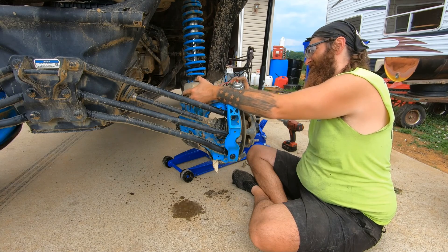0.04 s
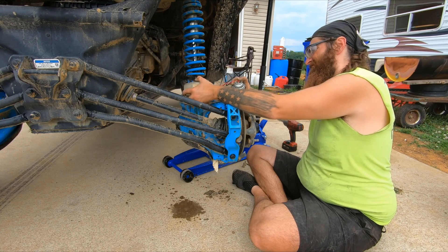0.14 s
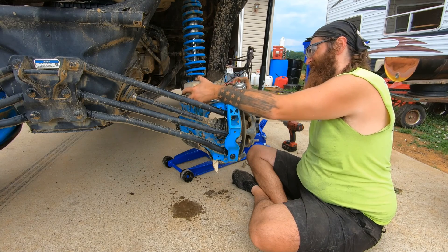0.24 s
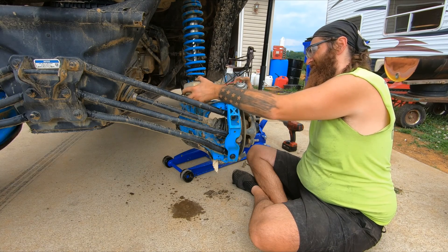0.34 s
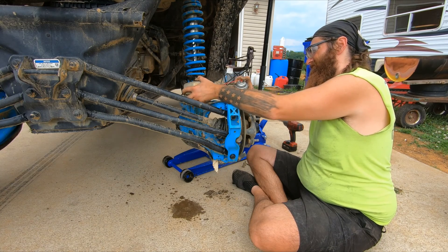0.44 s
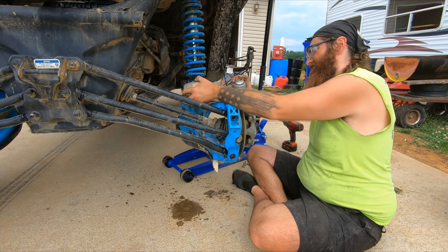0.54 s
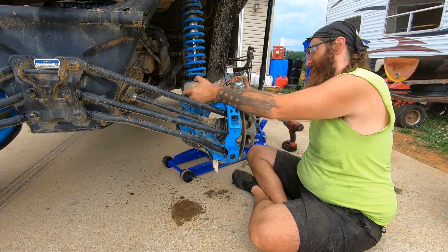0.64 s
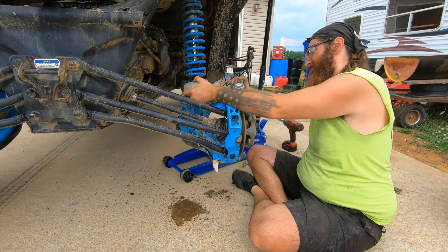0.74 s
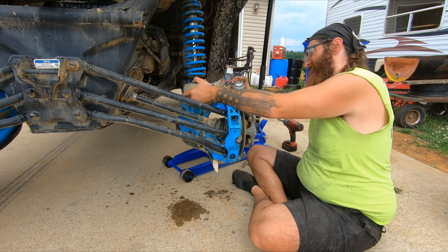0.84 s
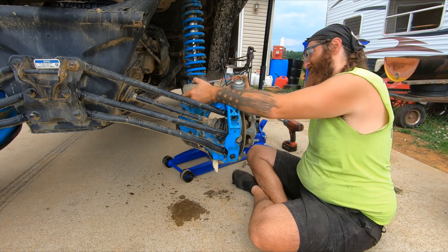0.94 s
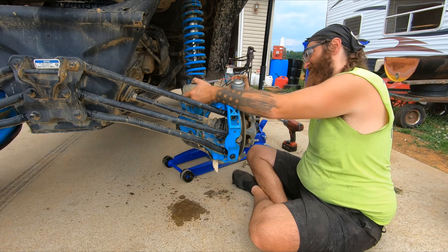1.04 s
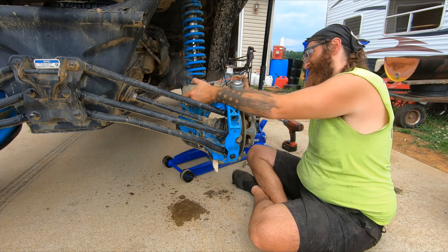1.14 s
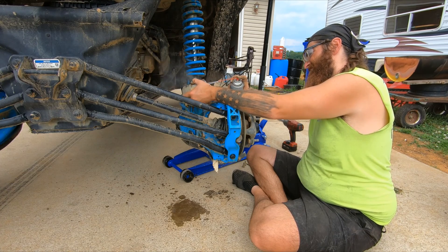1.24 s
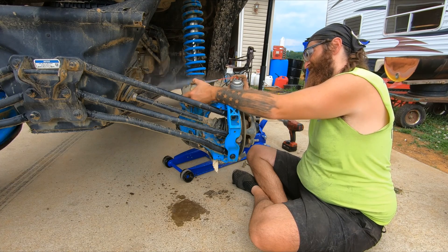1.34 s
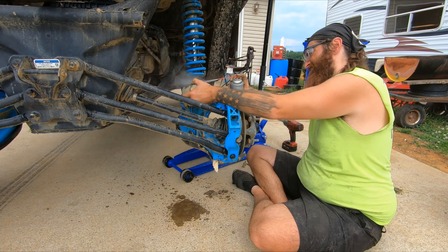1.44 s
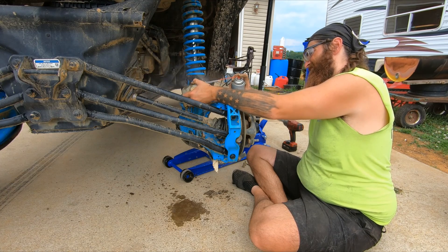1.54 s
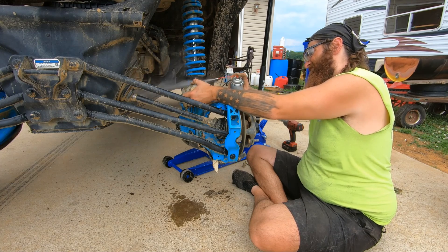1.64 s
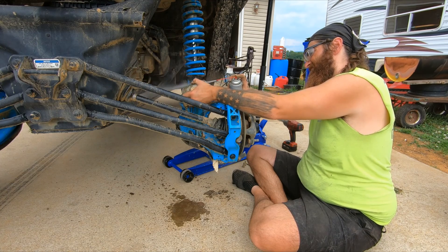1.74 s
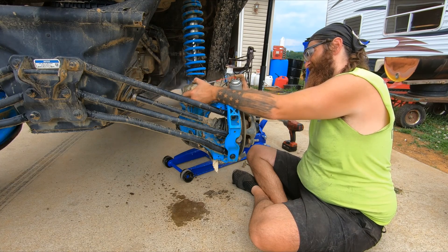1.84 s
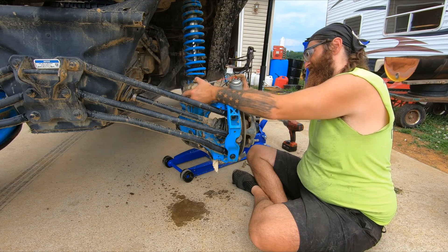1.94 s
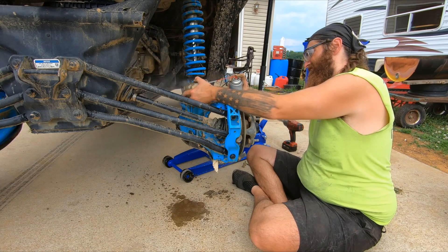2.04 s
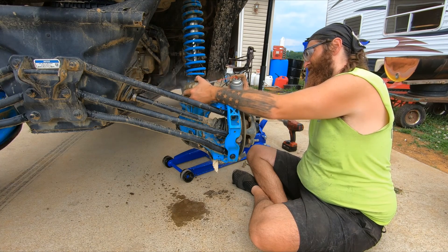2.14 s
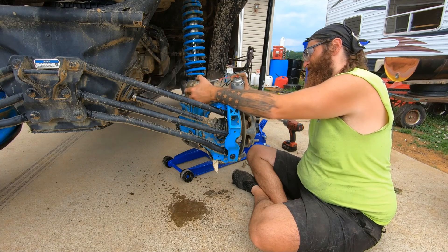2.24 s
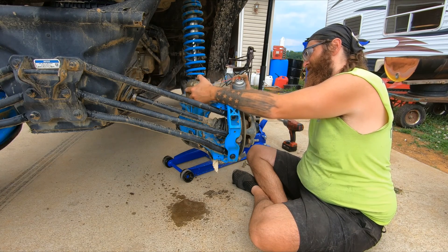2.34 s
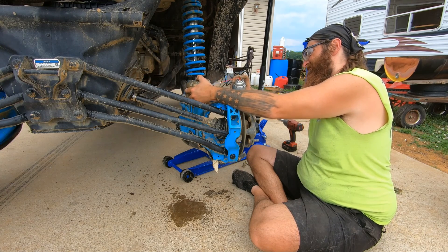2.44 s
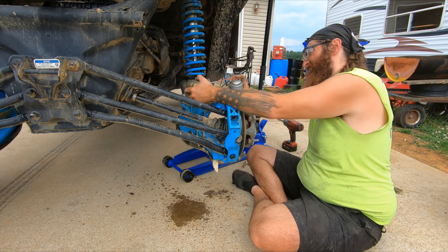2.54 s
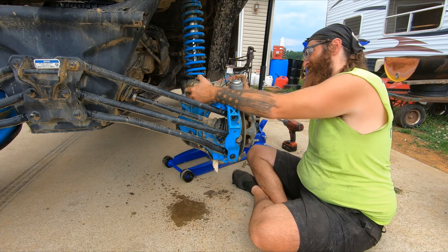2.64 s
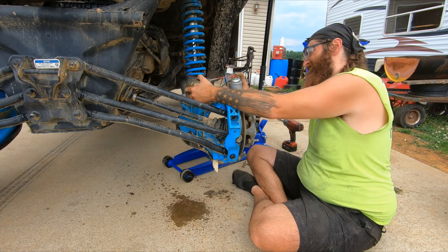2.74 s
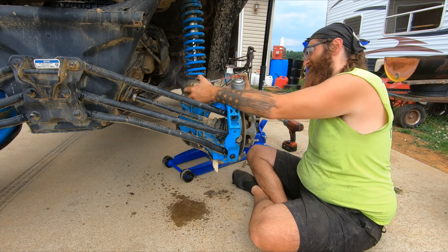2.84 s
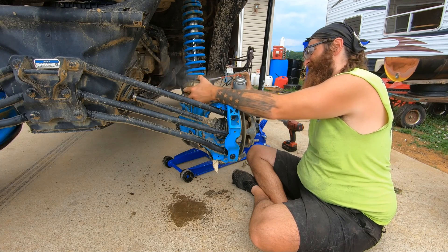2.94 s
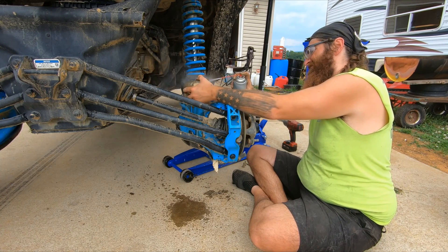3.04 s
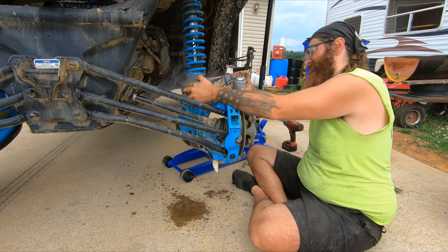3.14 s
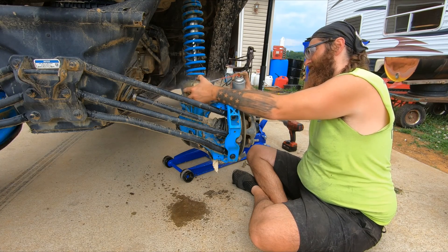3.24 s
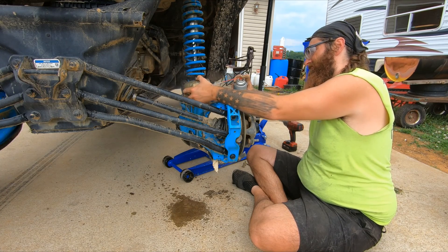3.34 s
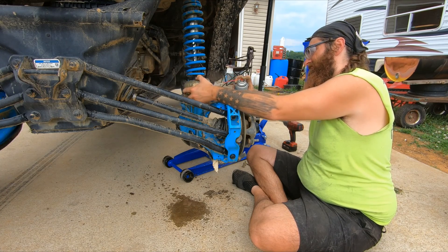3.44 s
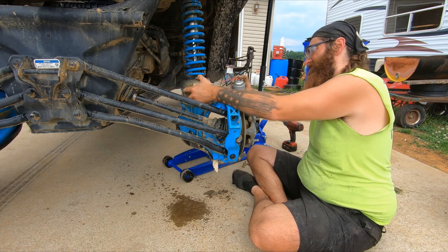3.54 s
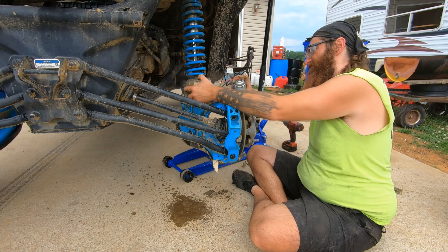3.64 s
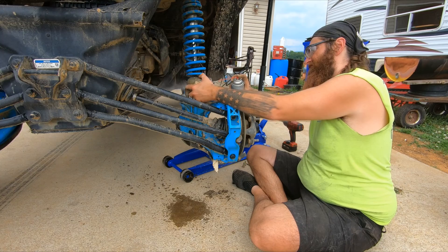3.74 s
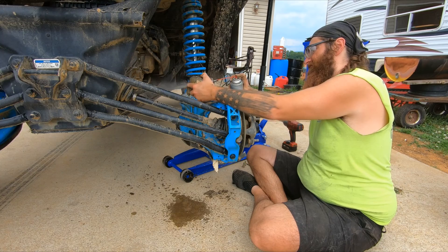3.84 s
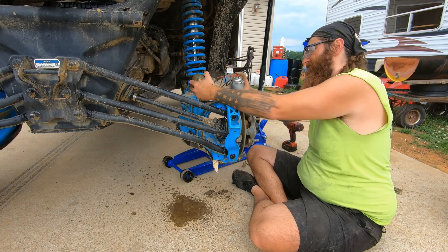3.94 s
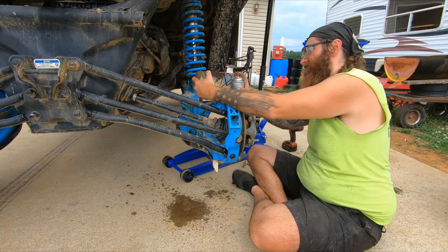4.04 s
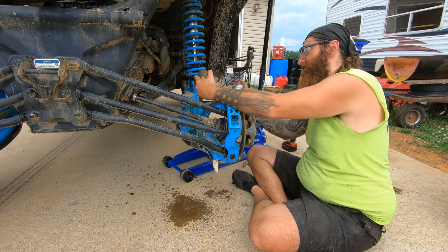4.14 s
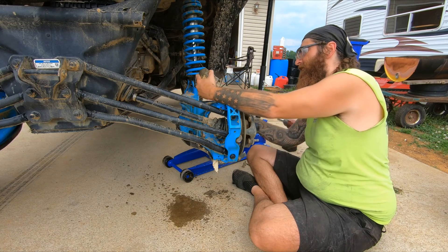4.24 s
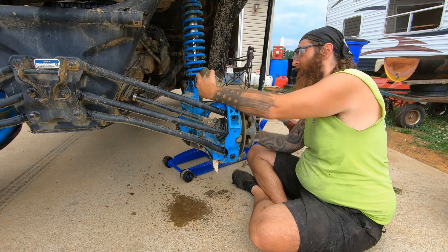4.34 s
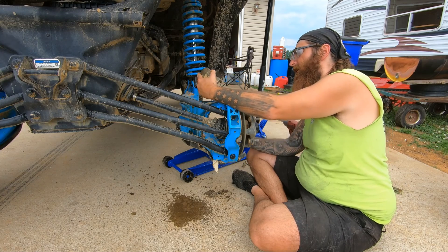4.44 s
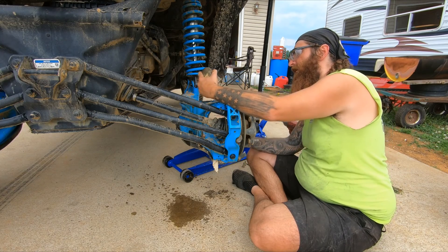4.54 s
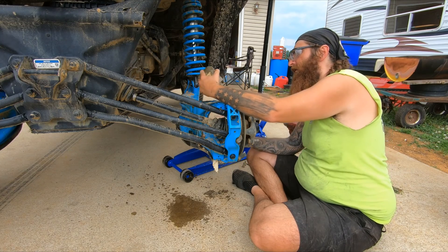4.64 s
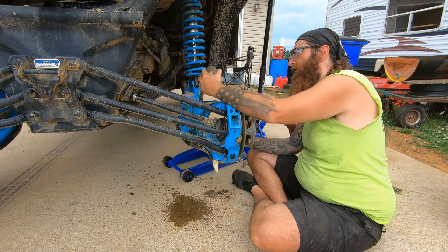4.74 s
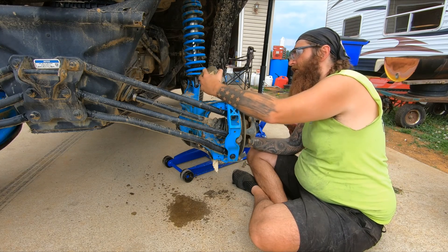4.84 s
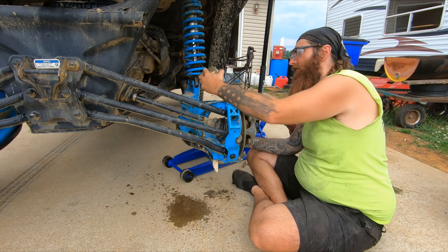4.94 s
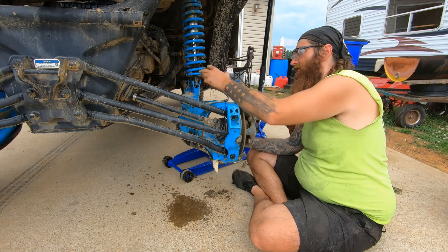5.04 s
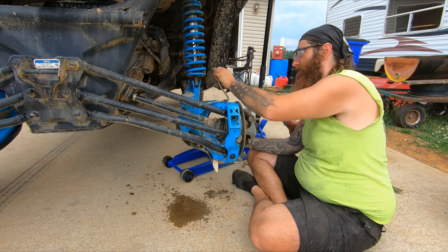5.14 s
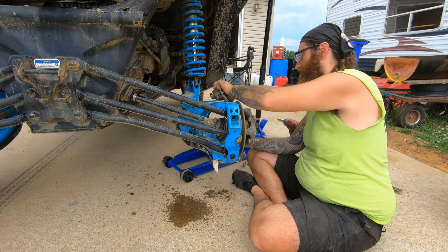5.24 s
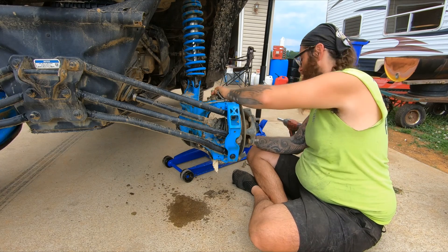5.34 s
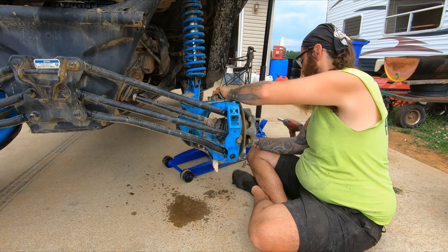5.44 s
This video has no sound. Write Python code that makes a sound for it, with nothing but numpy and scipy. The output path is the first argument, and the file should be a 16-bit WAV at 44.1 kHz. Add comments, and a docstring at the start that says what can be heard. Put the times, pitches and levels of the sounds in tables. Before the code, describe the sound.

Close, bright hiss of a pressurized spray can playing over hollow steel parts, with quick metallic ringing and dull splats as the jet crosses edges. Just before four seconds a brief wavering whistle appears, then the valve snaps shut. A faint leak fades, leaving a low engine drone, soft outdoor wash, a far bird's gliding notes and light rustles. Stereo microphone nearby in an open yard.

```python
"""A spray can hisses close by, and its jet makes hollow steel parts ring: noise excites their resonances.
A slow engine, built from multiples of its turning rate, drones all along over outdoor noise and low thumps.
Near the end of the spray a tube mouth whistles; then the valve shuts and a faint leak dies away.
After that a far bird calls in gliding tones, and noise swells rustle and tick in the yard."""
import sys
import numpy as np
from scipy import signal
from scipy.io import wavfile
from scipy.ndimage import uniform_filter1d, map_coordinates

SR = 44100
rng = np.random.default_rng(int(sys.argv[2]) if len(sys.argv) > 2 else 0)


def generate_wav(signal):
    """Clip the signal to [-1, 1] and save it as 16-bit WAV at the path in sys.argv[1]."""
    frames = np.transpose(np.atleast_2d(signal))
    scaled = np.clip(frames, -1, 1) * 32767
    pcm = np.round(scaled).astype(np.int16)
    wavfile.write(sys.argv[1], SR, pcm)


N = 242363

FLOW_DB = -36  # hiss level with the valve open
SHUT_S, SHUTTING_S = 4.064, 0.043  # moment the valve starts to shut, time it takes
SQUARENESS = 2.8  # swells on the steel and the engine have steep edges (2 = bell)


def gain_of(db):
    """Turns dB into a gain."""
    return 10 ** (np.asarray(db) / 20)


def evened(x):
    """Scales a signal to rms 1."""
    return x / np.sqrt(np.mean(x ** 2) + 1e-20)


def read(points, hz):
    """Reads a table over frequency, on a log axis, as a column."""
    f, value = np.transpose(points)
    return np.interp(np.log(hz + 1), np.log(f + 1), value)[:, None]


def curve(rows, order):
    """Reads one column of a table over time, sample by sample."""
    rows = np.array(rows)
    return np.interp(np.arange(N) / SR, rows[:, 0], rows[:, order])


def drift(top_hz):
    """Smooth random wavering of rms 1, with up to top_hz changes a second."""
    knots = rng.standard_normal(400)
    coarse = np.arange(0, N + 128, 128)
    smooth = map_coordinates(knots, [coarse / SR * 2 * top_hz], order=3)
    return evened(np.interp(np.arange(N), coarse, smooth))


def bumps(rows, squareness=2):
    """Power of smooth swells (middle t/s, length/s, level/dB), one row each, every 64 samples."""
    t = np.arange(0, N + 64, 64) / SR
    rows = np.array(rows)
    shape = np.exp(-abs(2 * (t - rows[:, :1]) / rows[:, 1:2]) ** squareness)
    return t, gain_of(2 * rows[:, 2:]) * shape


def hiss(colour, patchy_db, same=0., lead=0., tilt_db=0., ridges_db=0.):
    """Stereo noise from random short-time spectra, with drifting patches and narrow, shifting ridges."""
    # where the shifting ridges show: f/Hz, share of their depth
    ridge_share = [(400, .5), (2500, .5), (4000, 1), (10500, 1), (11500, .5)]
    hz = np.fft.rfftfreq(1024, 1 / SR)
    a, b, c, d, patches, ridges = rng.standard_normal((N // 256 + 5, 513, 6)).T
    patches = uniform_filter1d(patches, size=12, axis=0)
    patches = evened(uniform_filter1d(patches, size=10, axis=1))
    # narrow in frequency, long in time
    ridges = uniform_filter1d(ridges, size=2, axis=0)
    ridges = evened(uniform_filter1d(ridges, size=70, axis=1))
    left = a + 1j * b
    same = np.clip(same, -1, 1)
    right = same * left * np.exp(-1j * lead) + np.sqrt(1 - same ** 2) * (c + 1j * d)
    spectra = np.array([left * gain_of(tilt_db / 2), right * gain_of(-tilt_db / 2)])
    ridge_level_db = ridges_db * read(ridge_share, hz) * ridges
    spectra *= gain_of(read(colour, hz) + patchy_db * patches + ridge_level_db)
    return evened(signal.istft(spectra, nperseg=1024, noverlap=768)[1][:, :N])


def mode(force, hz, width, apart, order=1):
    """One resonance driven by noise: a pole pair, used once or, for steeper sides, twice; channels differ."""
    r = np.exp(-np.pi * width * order / SR)
    sections = [[1, 0, -0.997, 1, -2 * r * np.cos(2 * np.pi * hz / SR), r * r]] * order
    common, own = rng.standard_normal((2, N))
    drops = force * np.array([common + apart * own, 0.89 * (common - apart * own)])
    impulse_response = signal.sosfilt(sections, signal.unit_impulse(SR // 4))
    return signal.sosfilt(sections, drops) / np.linalg.norm(impulse_response)


def open_valve():
    """Flow through the nozzle as a gain: it builds up, is quickly shut, then a leak dies away."""
    leak_db, leak_db_per_s = -63, -135  # level once shut, and how fast it then falls
    build_db, build_s = -1, 0.78  # the flow starts a little weaker and builds up
    t = np.arange(N) / SR
    late = t - SHUT_S
    shut = np.clip(late / SHUTTING_S, 0, 1)
    start_db = build_db * np.clip(1 - t / build_s, 0, 1) ** .5
    dying_db = leak_db_per_s * np.maximum(late - SHUTTING_S, 0)
    return gain_of(FLOW_DB + start_db + (leak_db - FLOW_DB) * shut + dying_db)


def nozzle():
    """Turbulent flow makes a hiss that flickers quickly and dips now and then."""
    # colour of the hiss: f/Hz, relative level/dB per Hz
    colour = [(150, -47.5), (250, -21), (625, -8), (1270, -4.5), (1900, -3.5), (4100, -3), (7800, -8.5),
              (8350, -3), (8700, -12), (9500, -2), (10050, 0), (11600, -17), (13000, -13.5), (14200, -14.5),
              (15100, -23), (15300, -28), (15700, -32.5)]
    # brief dips of the hiss: t/s, level/dB
    dips = [(1.97, -3), (2.76, -6), (3.41, -6.5), (3.77, -4.5), (3.869, -8.5)]
    # left against right: f/Hz, likeness (0 to 1)
    likeness = [(60, 0.89), (99, 0.98), (160, 0.93), (270, 0.6), (450, .95), (700, 0.8), (900, .5),
                (1220, 0.65), (1500, .85), (2010, 0.7), (3000, 0.97), (4300, 0.94), (5200, 0.76),
                (7200, 0.78), (8400, .1), (9400, .62), (10500, .45), (13400, .4), (15000, 0.6)]
    # left against right: f/Hz, phase by which left leads/rad
    phase_lead = [(0, 0), (800, .4), (1000, 0), (1300, -.8), (1700, .3), (2050, -.4), (3100, 0), (5680, .2),
                  (6800, 0.5), (7320, .9), (7920, 1.3), (8900, -1.7), (9700, -.5), (10500, -1),
                  (11000, 1.2), (12000, 0.0), (15200, 0.0)]
    # left against right: f/Hz, level/dB
    balance = [(60, -1.0), (110, -1.0), (200, -0.5), (380, -1.3), (700, 1.5), (1290, 1.5), (2380, 1.0),
               (4400, 1.5), (8120, 0.3), (15000, 0.7)]
    sputter_db, patchy_db, ridges_db = 0.26, 2, 3  # flicker of the flow, drifting patches, shifting ridges
    hz = np.fft.rfftfreq(1024, 1 / SR)
    t = np.arange(N) / SR
    noise = hiss(colour, patchy_db, read(likeness, hz), read(phase_lead, hz), read(balance, hz), ridges_db)
    dips_db = sum(db * np.exp(-((t - s) / 0.009) ** 2) for s, db in dips)
    return gain_of(sputter_db * drift(25.0) + dips_db) * open_valve() * noise


def ring(modes, steady_db, swells, apart, favoured_hz=None, order=2):
    """The jet drives resonances steadily; each swell lifts them, most those near its favoured pitch."""
    flutter_db, wander_db = 1.36, 1.5  # shake of the hand; each mode waxes and wanes as the jet moves
    spill, favour = .22, 2.6  # share of a swell's power in all modes, and extra in the favoured ones
    focus = 0.06  # relative pitch range that a swell favours
    t, power = bumps(swells, SQUARENESS)
    steady = gain_of(2 * (steady_db + flutter_db * drift(14.)))
    flow = open_valve() / gain_of(FLOW_DB)
    out = np.zeros((2, N))
    for hz, width, db in modes:
        near = np.ones(len(power))
        if favoured_hz is not None:
            near = spill + favour / (1 + (np.log(hz / favoured_hz) / focus) ** 4)
        force = np.sqrt(steady + np.interp(np.arange(N) / SR, t, near @ power))
        level = gain_of(db + wander_db * drift(4.004))
        out += mode(level * force * flow, hz, width, apart, order=order)
    return out / np.linalg.norm(gain_of([m[2] for m in modes]))


def steel():
    """The jet makes thick and thin parts ring and splats dully; lasting ridges colour the hiss."""
    # resonances of the thick parts: f/Hz, width/Hz, relative level/dB
    thick_modes = [(1062, 35, -3), (1475.5, 53, 5), (1584, 80, -2), (1606, 27, 2.5), (1755, 48, 7.5),
                   (1900, 20, 4.5), (1980, 190, 7)]
    # resonances of the thin parts: f/Hz, width/Hz, relative level/dB
    thin_modes = [(2110, 50, -4.5), (2265, 44, 2.5), (2460, 72, 3), (2570, 78, 2), (2857, 33, 1),
                  (2962, 40, -4.5), (3106, 81, 6.5), (3238, 37, -2.5), (3614, 84, 1), (4430, 51, -5)]
    # resonances of the dull splash: f/Hz, width/Hz, relative level/dB
    splash_modes = [(410, 193, -3), (607, 42, -5.5), (903, 440, -1)]
    # lasting ridges in the upper hiss: f/Hz, width/Hz, level against the flow/dB
    lasting_ridges = [(5220, 54, -27), (5720, 86, -17), (6286, 85, -15), (6630, 38, -17), (6890, 120, -15),
                      (7280, 51, -17), (7660, 88, -13.5)]
    # slow aim of the jet: t/s, thick parts level/dB, thin parts level/dB
    aim = [(0.0, -41.5, -40), (0.2, -46.5, -44), (0.33, -42, -43.5), (0.55, -46.5, -46.5),
           (0.72, -42, -41.5), (.8, -39, -41), (.86, -42.5, -37), (0.97, -37.5, -39), (1.15, -41, -43.5),
           (1.39, -47, -47), (1.83, -46.5, -44.5), (2.34, -42.5, -47), (2.58, -49, -36.5),
           (2.87, -43.5, -41), (3.15, -49, -47.5), (3.73, -54, -44), (3.92, -44, -43.5), (4.03, -54, -64)]
    # the jet crosses an edge: middle t/s, length/s, thick parts level/dB, thin parts level/dB, favoured f/Hz
    crossings = [(0.04, 0.038, -27, -29, 2740), (0.562, 0.036, -31, -42, 3100),
                 (0.622, 0.1, -38, -46.5, 1740), (0.684, 0.025, -45, -34, 2950),
                 (0.686, 0.022, -34, -37, 1875), (0.78, 0.018, -37.5, -37, 1900),
                 (0.81, 0.032, -47, -37, 2490), (0.888, 0.029, -31, -35.5, 2470),
                 (0.927, 0.016, -32, -38.5, 1810), (0.931, 0.027, -41.5, -30, 2880),
                 (.932, 0.018, -44.5, -35, 2500), (1.02, 0.03, -34.5, -33.5, 2490),
                 (1.053, 0.024, -34, -55, 1490), (1.053, 0.042, -42.5, -35, 3180),
                 (1.103, 0.025, -44, -32, 1920), (1.166, 0.045, -46, -45.5, 3200),
                 (1.178, 0.044, -58, -31.5, 4430), (1.266, 0.051, -34, -54, 1860),
                 (1.33, 0.039, -38.5, -34, 1900), (1.401, 0.069, -37.5, -33.5, 1780),
                 (1.446, 0.0079, -29.5, -63, 1910), (1.548, 0.042, -34.5, -30.5, 1810),
                 (1.699, 0.017, -32.5, -43, 2050), (1.856, 0.028, -40.5, -56, 1980),
                 (1.967, 0.012, -32.5, -30.5, 1700), (2.063, 0.0085, -37, -30.5, 1820),
                 (2.214, 0.039, -40.5, -54, 1750), (2.328, 0.023, -51, -34, 2370),
                 (2.333, 0.021, -55, -39.5, 3130), (2.354, 0.018, -32, -33, 2500),
                 (2.469, 0.025, -27.5, -25, 2460), (2.473, 0.029, -58, -37, 3030),
                 (2.57, .07, -56.5, -31, 4430), (2.543, 0.034, -33, -36.5, 3150),
                 (2.58, 0.054, -34, -35, 3200), (2.636, 0.021, -32.5, -32, 3180),
                 (2.611, 0.028, -36, -50, 1600), (2.716, 0.024, -53, -39.5, 3140),
                 (2.725, 0.029, -31, -25.5, 2780), (2.822, 0.022, -33, -32, 3140),
                 (2.834, 0.078, -50, -37, 2300), (2.89, 0.014, -50, -44, 3050), (3, 0.014, -38, -41, 2490),
                 (3.392, 0.016, -38, -34.5, 2950), (3.441, 0.047, -37.5, -40.5, 2100),
                 (3.503, 0.03, -30, -30.5, 2570), (3.507, 0.032, -55, -37, 3130),
                 (3.594, 0.043, -41, -56, 1750), (3.764, 0.022, -41.5, -35, 1900),
                 (3.854, 0.05, -39, -39.5, 2750)]
    # the jet splats on a flat face: middle t/s, level/dB
    splats = [(.565, -48.5), (0.684, -42), (.84, -49), (1.65, -50), (1.826, -48.5), (1.863, -47),
              (1.967, -42.5), (2.066, -41), (2.358, -40), (2.746, -47), (3.392, -41), (3.64, -45.5),
              (3.77, -40.5), (3.843, -39)]
    splat_s, splash_db = 0.017, -55  # length of every splat, steady splash level
    s, length, thick_db, thin_db, hz = np.transpose(crossings)
    thick = ring(thick_modes, curve(aim, order=1), np.c_[s, length, thick_db], 0.37, hz)
    thin = ring(thin_modes, curve(aim, order=2), np.c_[s, length, thin_db], 0.2, hz)
    splat_swells = [(at, splat_s, db) for at, db in splats]
    splash = ring(splash_modes, splash_db, splat_swells, 0.148, order=1)
    flow = open_valve() * (np.arange(N) / SR < SHUT_S + SHUTTING_S)
    ridges = sum(mode(flow * gain_of(db + 3.25 * drift(1.416)), hz, width, 0.66)
                 for hz, width, db in lasting_ridges)
    return thick + thin + splash + ridges


def whistle():
    """The jet blows across a tube mouth: a wavering, throbbing tone with airy noise that outlasts the spray."""
    # the tone and its noise: t/s, f/Hz, level/dB
    blown_tone = [(3.88, 1590, -70), (3.908, 1590, -43), (3.93, 1600, -50), (3.95, 1590, -41),
                  (3.972, 1590, -36), (4.0, 1610, -43), (4.022, 1645, -37), (4.045, 1625, -48),
                  (4.066, 1640, -43), (4.085, 1660, -64), (4.125, 1650, -73), (4.16, 1660, -76),
                  (4.26, 1650, -88)]
    faded_in_and_out = [(0, 0, -140)] + blown_tone + [(4.5, 0, -140)]
    force = gain_of(curve(faded_in_and_out, order=2))
    pitch = curve(blown_tone, order=1) * (1 + 0.0047 * drift(23.0))
    tone = np.sqrt(2) * np.sin(2 * np.pi * np.cumsum(pitch) / SR)
    airy = 0.99 * mode(force, 1640, 42.0, .2)
    return force * tone * gain_of([[.7], [-.7]]) + airy


def yard(x, level_db, t60):
    """Walls around return a short diffuse echo: dying noise, different in each channel."""
    t = np.arange(SR // 2) / SR
    # t60 is the time to fall by 60 dB; the echo starts after 8 ms
    tail = rng.standard_normal((2, len(t))) * gain_of(-60 * t / t60) * (t > .008)
    return gain_of(level_db) * signal.fftconvolve(x, tail / np.linalg.norm(tail[0]), axes=1)[:, :N]


def engine():
    """Multiples of the turning rate waver one by one; the lowest share a boom, the ninth swells alone."""
    # strength of each multiple (the ninth takes its level from its swells): multiple, relative level/dB
    orders = [(1, -37), (2, -32), (3, -11), (4, -5), (5, -4.5), (6, -13.5), (7, -6), (8, -10.5), (9, 0),
              (10, -10.5), (11, -9.5), (12, -15.5), (13, -16.5), (14, -13.5), (15, -31), (16, -26.5)]
    # shared level of the first six multiples: t/s, level/dB
    boom = [(0.0, -58), (0.03, -45.5), (0.14, -54), (0.17, -76), (0.21, -55), (0.35, -69), (0.4, -51),
            (0.55, -52.5), (0.58, -41.5), (0.76, -63.5), (1.19, -53.5), (1.54, -61), (1.65, -54.5),
            (1.97, -70), (2.0, -53), (2.28, -60.5), (2.77, -64.5), (2.81, -64), (3.03, -57), (3.15, -70),
            (3.26, -55.5), (3.62, -59), (3.72, -54.5), (3.84, -65), (3.87, -47), (4.07, -63), (4.13, -53.5),
            (5.26, -57), (5.31, -44.5), (5.41, -54), (5.46, -45), (5.49, -45)]
    # swells of the ninth multiple: middle t/s, length/s, level/dB
    ninth_swells = [(1.25, 1.46, -53.5), (2.65, 0.62, -52.5), (3.82, 0.95, -53), (5.25, 0.33, -59)]
    engine_hz = 19.9  # turns a second
    rest_db, upper_db = -79, -58  # the ninth between swells, steady base of the higher multiples
    waver_db, ninth_waver_db = 3.5, 1.5  # drift in level
    turns = np.cumsum(engine_hz * (1 + 0.002 * drift(1.465))) / SR
    t, power = bumps(ninth_swells, SQUARENESS)
    swelling = np.interp(np.arange(N) / SR, t, power.sum(axis=0))
    ninth = np.sqrt(gain_of(2 * rest_db) + swelling) * gain_of(ninth_waver_db * drift(2.5))
    out = np.zeros(N)
    for k, db in orders:
        base_db = curve(boom, order=1) if k < 7 else upper_db
        level = ninth if k == 9 else gain_of(base_db + db + waver_db * drift(3.4))
        phase = k * turns + rng.random() + .08 * drift(3.7)
        out += level * np.sqrt(2) * np.cos(2 * np.pi * phase)
    return out * gain_of([[-.3], [.3]])


def bird():
    """Gliding whistles, a little rough in pitch and level, with an echo."""
    # one list for each note: t/s, f/Hz, level/dB before the left-right balance
    notes = [
        [(4.132, 4550, -70), (4.152, 4560, -65), (4.16, 4450, -78), (4.175, 4300, -75), (4.19, 4200, -78)],
        [(4.237, 4120, -73), (4.254, 4020, -71), (4.26, 3800, -80), (4.266, 3680, -68), (4.273, 3550, -81),
         (4.282, 3380, -77)],
        [(4.361, 4060, -74), (4.38, 3950, -72), (4.385, 3800, -76), (4.39, 3680, -66), (4.396, 3500, -80),
         (4.403, 3350, -74)],
        [(4.497, 7700, -80), (4.503, 6700, -78), (4.513, 6050, -72), (4.53, 5760, -69), (4.542, 5650, -74),
         (4.556, 5300, -68), (4.566, 5080, -73)],
        [(4.615, 3150, -82), (4.65, 3430, -75), (4.675, 3550, -70), (4.705, 3580, -68), (4.74, 3760, -69),
         (4.76, 3680, -75), (4.782, 3350, -78)],
        [(4.813, 7500, -78), (4.822, 6350, -75), (4.833, 5950, -68), (4.848, 5650, -73), (4.862, 5450, -68),
         (4.872, 5400, -76)],
        [(4.928, 3000, -82), (4.945, 3330, -74), (4.975, 3400, -76), (5.0, 3580, -74), (5.027, 3790, -67),
         (5.04, 3790, -74), (5.055, 3650, -81)],
        [(5.205, 2660, -79), (5.225, 2650, -76), (5.245, 2640, -79)],
    ]
    burr, rasp_db = 0.008, 2  # quick wavering of pitch (share) and of level
    echo_db, echo_t60 = 0, .3  # level, seconds to fall by 60 dB
    out = np.zeros(N)
    pitch_waver, level_waver = drift(29.0), drift(33.)
    for rows in notes:
        s, hz, db = np.transpose(rows)
        at = np.arange(round(s[0] * SR), round(s[-1] * SR))
        pitch = np.interp(at / SR, s, hz) * (1 + burr * pitch_waver[at])
        turns = np.cumsum(pitch) / SR
        level = gain_of(np.interp(at / SR, s, db)) * signal.windows.tukey(len(at), .1)
        out[at] += level * np.sqrt(2) * np.sin(2 * np.pi * turns)
    direct = out * gain_of([[-6.5], [.5]] + rasp_db * level_waver)
    return direct + yard(direct, echo_db, echo_t60)


def rustle():
    """Something stirs: soft wide noise sets in quickly and fades a little more slowly."""
    # colour of the rustle: f/Hz, relative level/dB per Hz
    colour = [(700, -14.5), (1500, -4.5), (3000, -5), (6000, -7.5), (8000, -14), (9500, -26), (11000, -24),
              (12000, -44)]
    # stirrings, timed at half gain: start t/s, end t/s, level/dB
    stirs = [(4.402, 4.57, -75), (4.652, 4.93, -69), (5.032, 5.245, -71), (5.36, 5.6, -71),
             (5.398, 5.6, -76), (5.46, 5.6, -71)]
    edge_s, fade_s = 0.032, 0.045  # time to set in, time to fade
    t = np.arange(N) / SR
    level = np.zeros(N)
    for s, end, db in stirs:
        ramp = np.minimum((t - s) / edge_s, (end - t) / fade_s) + .5
        level += gain_of(db) * np.clip(ramp, 0, 1)
    return level * hiss(colour, 2.3, 0.24)


def ticks():
    """Faint ticks in the yard: short soft puffs of noise through a resonance."""
    # the puffs: middle t/s, level/dB, f/Hz
    puffs = [(4.217, -72, 4000), (4.76, -76, 1950), (5.21, -78, 1980)]
    tick_s = .005  # from the middle down to 1/e
    t = np.arange(N) / SR
    return sum(mode(gain_of(db) * np.exp(-((t - s) / tick_s) ** 2), hz, hz ** 2 / 1e4, .3, order=2)
               for s, db, hz in puffs)


def thumps():
    """Dull low bumps, as of light wind: noise swells through one low resonance."""
    # the bumps: middle t/s, length from there down to 1/e/s, level/dB
    gusts = [(3.05, 0.056, -53), (4.27, 0.045, -72), (5.326, 0.089, -65), (5.48, 0.038, -62)]
    t = np.arange(N) / SR
    force = sum(gain_of(db) * np.exp(-((t - s) / length) ** 2) for s, length, db in gusts)
    return mode(force, 120.0, 36.0, 0.12)


def air():
    """Distant outdoor wash, strongest around 70 to 200 Hz: noise alike in both channels plus noise opposed."""
    # colour of the common part: f/Hz, relative level/dB per Hz
    mid_colour = [(12, -55.5), (20, -32), (51, -44.5), (70, 2), (205, 2.5), (315, -12.5), (483, -26),
                  (848, -23.5), (1050, -30.5), (1750, -32), (3500, -24.5), (4830, -37), (6840, -37.5),
                  (9950, -49.5), (12000, -79), (15600, -103), (22000, -120)]
    # colour of the opposed part, with a lesser hump near 800 Hz: f/Hz, relative level/dB per Hz
    side_colour = [(12, -43), (20, -9), (175, 3.5), (458, -12.5), (553, -11), (804, -2), (1050, -11.5),
                   (1750, -19), (3230, -21), (4460, -34), (6310, -21.5), (9950, -36), (12000, -57),
                   (15600, -96.5), (22000, -120)]
    mid = gain_of(-57) * hiss(mid_colour, 2.6)[0]
    side = gain_of(-64) * hiss(side_colour, 1.3)[0]
    return np.array([mid + side, mid - side])


def scene():
    """Adds all sources; the top of the spray sound dies first once the valve is shut."""
    top_hz, top_db_per_s = 11100, -250
    spray = nozzle() + steel() + whistle()
    spray = spray + yard(spray, -17.5, 0.21)
    high_pass = signal.butter(4, top_hz, "high", fs=SR, output="sos")
    top = signal.sosfiltfilt(high_pass, spray)
    since_shut = np.maximum(np.arange(N) / SR - SHUT_S - SHUTTING_S, 0)
    spray = spray - (1 - gain_of(top_db_per_s * since_shut)) * top
    return spray + engine() + bird() + rustle() + ticks() + thumps() + air()


def record(dry):
    """Limits the band: a steep low-pass filter removes what lies above 15.7 kHz."""
    low_pass = signal.firwin(1023, 15700, window=("kaiser", 9), fs=SR)
    return signal.oaconvolve(dry, low_pass[None], "same")


dry = scene()
out = record(dry)
generate_wav(out)
```